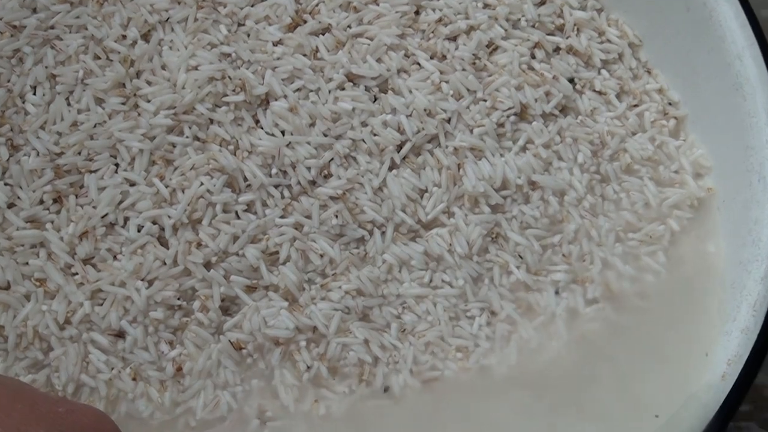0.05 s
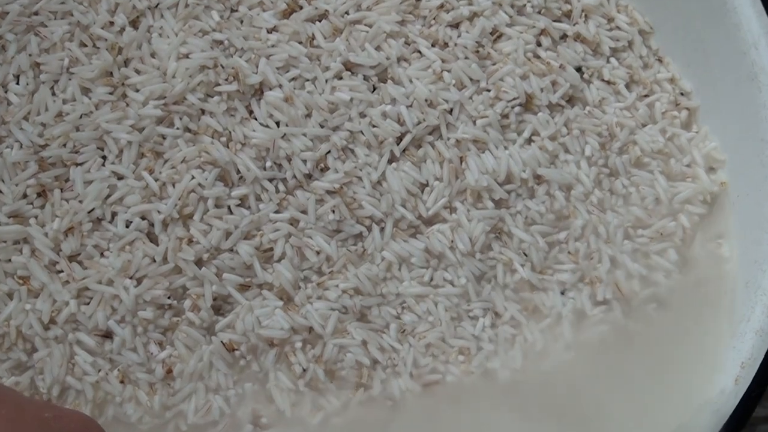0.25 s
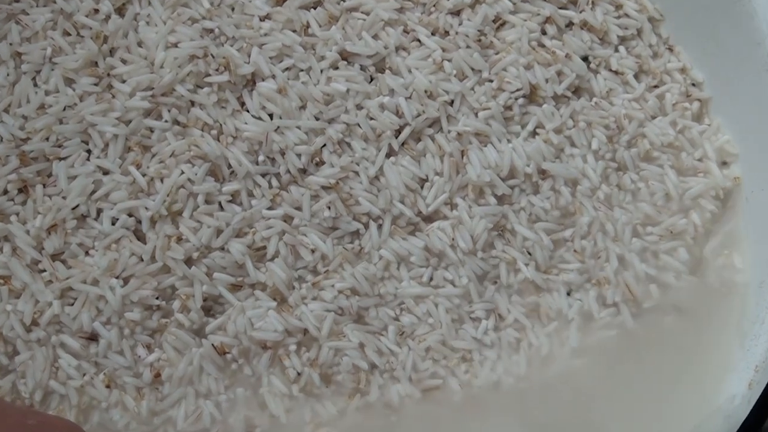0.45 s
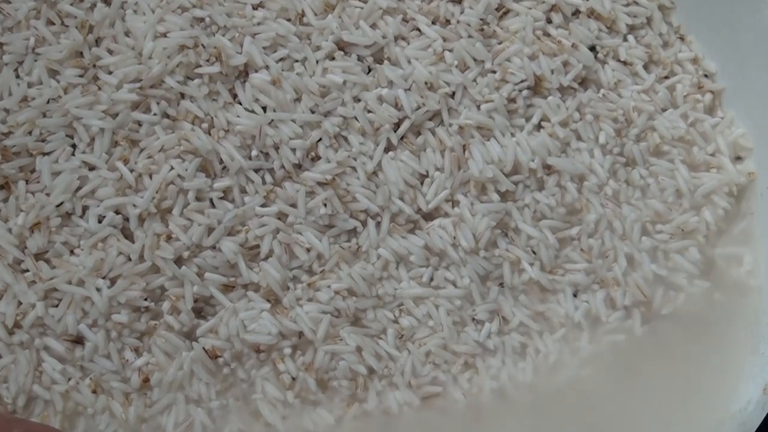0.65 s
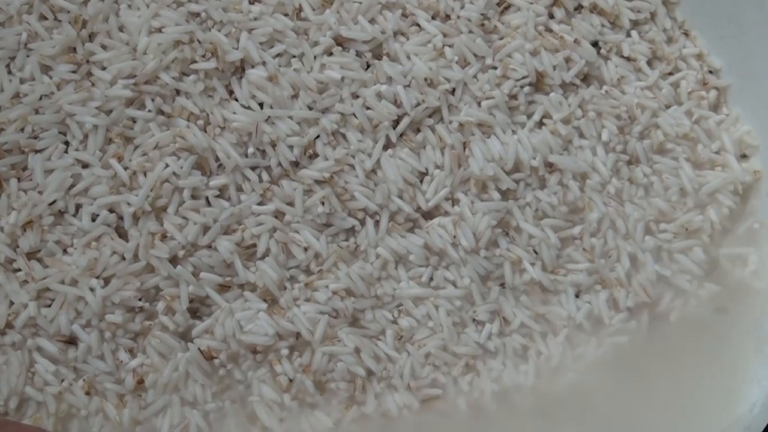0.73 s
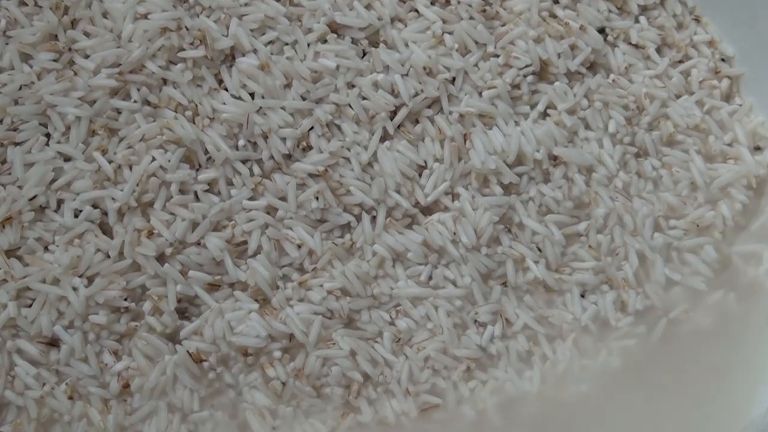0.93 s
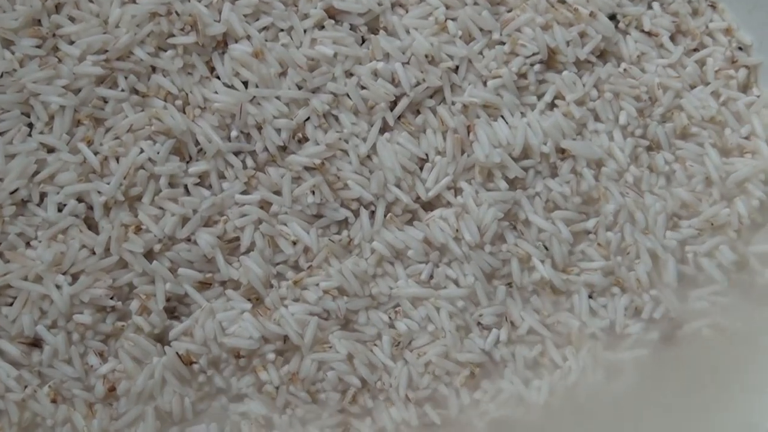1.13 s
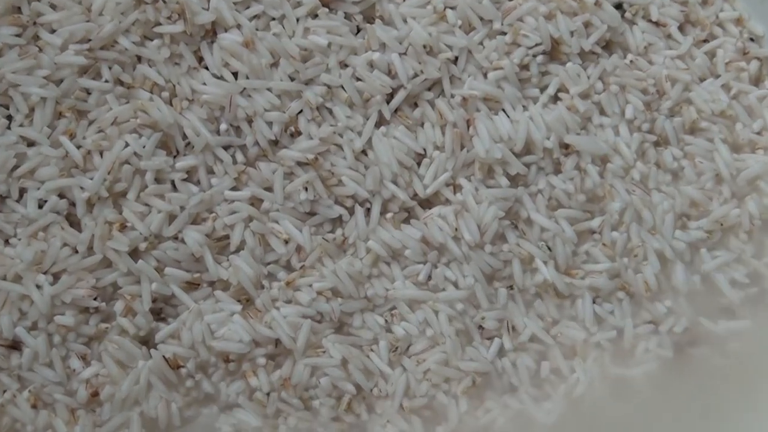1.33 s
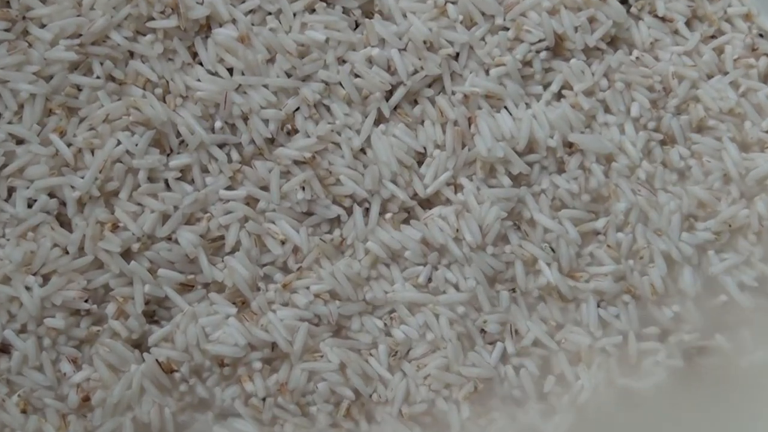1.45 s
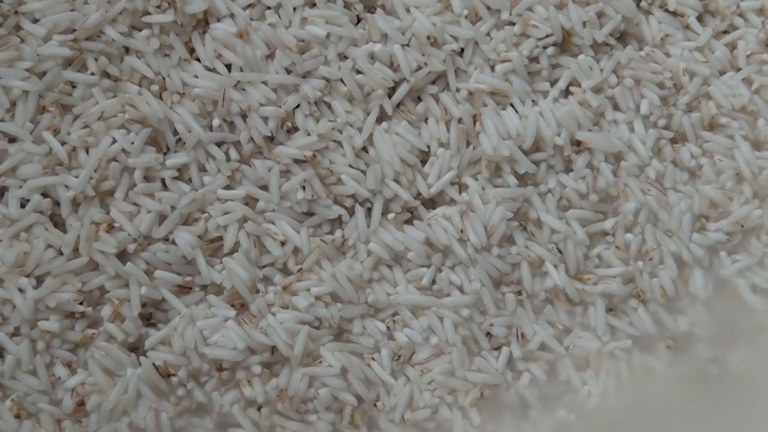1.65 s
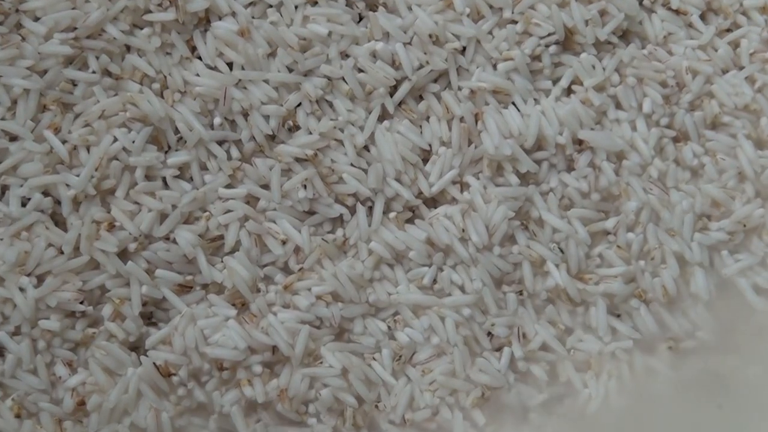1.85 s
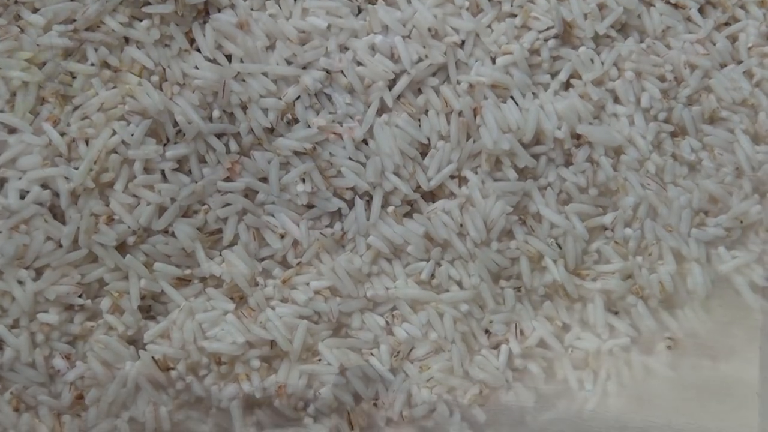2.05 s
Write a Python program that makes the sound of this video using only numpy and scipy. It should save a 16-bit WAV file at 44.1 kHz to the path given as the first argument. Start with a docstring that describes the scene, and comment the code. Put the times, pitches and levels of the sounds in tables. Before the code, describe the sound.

Water draining through wet rice with small irregular pops, ticks and a fine fizz.

```python
"""Water drains through wet rice in a bowl, close to the microphone, in a quiet kitchen.
First come small ticks over a fine fizz and faint bubbles: air pockets open between the grains, and
each snaps and rings briefly. From 0.4 s large pockets join in as plops, around two soft hand bumps.
The fizz is strongest near 1 s, runs of collapsing foam crowd in near 1.5 s, and after a plop at 1.8 s
lighter ticks end the scene. The bowl and the kitchen answer every pop briefly."""
import sys
import numpy as np
from scipy import signal
from scipy.fft import rfft, irfft, next_fast_len
from scipy.io import wavfile

SR = 44100
rng = np.random.default_rng(int(sys.argv[2]) if len(sys.argv) > 2 else 0)


def generate_wav(sig):
    """Save sig (samples, or channels by samples) to the path in sys.argv[1] as 16-bit PCM at SR."""
    pcm = np.round(np.clip(np.atleast_2d(sig).T, -1, 1) * 32767).astype(np.int16)
    wavfile.write(sys.argv[1], SR, pcm)


N = 92610  # 2.1 s

POP_RISE, BUBBLE_RISE = 0.07, 0.077  # share by which the pitch climbs in one fade time
LOW_CUT_RATIO = 0.68  # sound below this share of a pocket's pitch is filtered away


def amp(db):
    """Turn decibels into a gain to multiply by."""
    return 10 ** (np.asarray(db) / 20)


def unit(x):
    """Scale a sound so that its average strength (rms) is 1."""
    return x / np.sqrt(np.mean(x ** 2))


def band(x, hz, kind, order=2):
    """Keep the "low" or the "high" side of a frequency; a higher order cuts more steeply."""
    return signal.sosfilt(signal.butter(order, min(hz, .45 * SR), kind, fs=SR, output="sos"), x)


def add(out, at, x):
    """Mix a short stereo sound in at a time in seconds."""
    i = int(np.clip(at * SR, 0, N - 1))
    out[:, i:i + x.shape[1]] += x[:, :N - i]


def spectrum_curve(points):
    """Join (Hz, value) points into a curve over all frequencies, on a log scale."""
    hz, value = np.array(points).T
    return np.interp(np.log(np.fft.rfftfreq(N, 1 / SR) + 1), np.log(hz), value)


def stereo(x, place):
    """The microphone's right opening hears a sound later than its left, by its place in the bowl."""
    size = next_fast_len(len(x) + 32)
    lag_s = np.array([[0], [43e-6 + 20e-6 * place]])
    delay = np.exp(-2j * np.pi * np.fft.rfftfreq(size, 1 / SR) * lag_s)
    return irfft(rfft(x, size) * delay, size)


def ring(hz, cycles, rise):
    """An air pocket swells and rings; `cycles` is its fade time, the swings it takes to fall to 37%."""
    turns = np.arange(int(7 * cycles / hz * SR) + 2) / SR * hz
    age = turns / cycles
    swell = 1 - np.exp(-turns / 0.18)
    tone = np.sin(2 * np.pi * turns * (1 + rise * (age / 2 - 1)))
    return swell * np.exp(-age) * tone


def background():
    """Quiet room noise with a faint wavering hum and a deep rumble."""
    # tone colour of the room noise (frequency [Hz], relative level [dB])
    colour = [(12, 4), (20, 0.5), (130, -6), (399, -11), (513, -8), (849, -11.5), (1000, -8), (1400, -13),
              (2080, -15.5), (3530, -13), (4060, -25), (5230, -17), (7310, -18.5), (14700, -24.5),
              (16000, -18)]
    # how alike the noise is left and right (frequency [Hz], likeness [-1 to 1])
    likeness = [(30, 0.22), (120, 1), (330, 0.34), (700, 0.5), (2500, 0.65), (7000, 0.045), (15000, 0.062)]
    # faint tones of the room (pitch [Hz], level [dB])
    hum_tones = [(51, -64.5), (104, -66), (132, -63), (528, -76)]
    common, side = rfft(rng.standard_normal((2, N))) * amp(spectrum_curve(colour))
    alike, left_right = np.clip(spectrum_curve(likeness), -1, 1), np.array([[1], [-1]])
    air = unit(irfft(np.sqrt(1 + alike) * common + left_right * np.sqrt(1 - alike) * side, N))
    t, hum = np.arange(N) / SR, np.zeros(N)
    for hz, db in hum_tones:
        waver = 0.87 * unit(band(rng.standard_normal(N), 9.5, "low"))
        hum += amp(db) * np.sqrt(2) * np.sin(2 * np.pi * hz * t + waver)
    deep = band(rng.standard_normal((3, N)), 21.3, "low")
    rumble = unit(deep[:2] + deep[2])  # the third noise is shared by both sides
    return amp(-47) * air + hum + amp(-45.5) * rumble


def echo_tail(db, fade_s):
    """Two unrelated washes of dense echoes that fall by 60 dB in fade_s seconds."""
    t = np.arange(SR // 3) / SR
    swell = 1 - np.exp(-(t / 0.0013) ** 2)
    wash = rng.standard_normal((2, len(t))) * np.exp(-np.log(1000) * t / fade_s) * swell
    return amp(db) * wash / np.sqrt(np.sum(wash ** 2, axis=1, keepdims=True))


def kitchen(x):
    """A sound arrives directly, with near echoes and the bowl's ring; a duller room tail follows."""
    # echoes from bowl, counter and wall (delay [ms], gain [factor])
    echoes = [(1.7, 0.14), (4.45, 0.19), (6.7, 0.14), (12.9, 0.11), (16.9, 0.13)]
    # the bowl's own notes (pitch [Hz], relative level [dB], time to fall by 60 dB [s])
    bowl_notes = [(530.6, -29, 0.11), (1015, -32, 0.062), (2248, -45, 0.11), (2755, -32.5, 0.029),
                  (3661, -30, 0.037), (5300, -31.5, 0.02)]
    # how much louder the left is than the right (frequency [Hz], level gap [dB])
    left_lead = [(500, -7.5), (2500, -1.5), (3700, -2.5), (5200, 1.3), (9000, -0.5), (14000, -0.7)]
    t, hz = np.arange(SR // 3) / SR, np.fft.rfftfreq(2 * N, 1 / SR)
    bowl = amp(-5.5) * sum(amp(db) * np.exp(-np.log(1000) * t / fade_s) * np.cos(2 * np.pi * pitch * t)
                           for pitch, db, fade_s in bowl_notes)
    bounces = sum(gain * np.exp(-2j * np.pi * hz * ms / 1000) for ms, gain in echoes)
    near = 1 + bounces + rfft(bowl, 2 * N)  # the 1 is the direct sound
    common, side = rfft(echo_tail(db=-7.5, fade_s=.055) + echo_tail(db=-10.5, fade_s=.09), 2 * N)
    alike = 1 / (1 + (hz / 6800) ** 2)  # low notes are alike on both sides
    left_right = np.array([[1], [-1]])
    far = np.sqrt(1 + alike) * common + left_right * np.sqrt(1 - alike) * side
    far /= np.sqrt(2 + 2 * (hz / 10400) ** 2)  # the tail loses treble
    balance = amp(left_right * np.interp(hz, *np.array(left_lead).T) / 2)
    return irfft(rfft(x, 2 * N) * (near + far) * balance)[:, :N]


def hand_bumps():
    """The hand shifts and gives two dull thuds."""
    # soft, low handling bumps (time [s], pitch [Hz], level before filtering [dB])
    bumps = [(0.328, 103, -33.5), (0.613, 43.4, -32.5)]
    out = np.zeros((2, N))
    for at, hz, db in bumps:
        thud = band(ring(hz, cycles=0.79, rise=0), 2 * hz, "low")
        add(out, at, stereo(amp(db) * thud, place=0))
    return out


def seeping(per_s, db, spread_db, low_hz, high_hz, cycles):
    """Many tiny pockets ring at random moments and places, louder while more water seeps."""
    # strength of the seeping (time [s], level change [dB])
    flow = [(0, -8.5), (.2, -9), (.27, 2.5), (.45, -0.5), (.62, -4.5), (.8, -10), (.98, 5), (1.2, -9.5),
            (1.44, -3.5), (1.65, -5), (1.75, -6.5), (1.9, -6.5), (2.1, -9)]
    out = np.zeros((2, N))
    for when, pitch, size, place in rng.random(size=(3000, 4))[:int(per_s * N / SR)]:
        at = when * N / SR
        boost_db = spread_db * min(-np.log(size), np.pi)  # a few pockets stand out
        strength = amp(db + np.interp(at, *np.array(flow).T) + boost_db)
        hz = low_hz + pitch * (high_hz - low_hz)
        add(out, at, stereo(strength * ring(hz, cycles, BUBBLE_RISE), 4 * place - 2))
    return band(out, LOW_CUT_RATIO * low_hz, "high")


def foam():
    """Foam gives way in dense runs of tiny cells, most pitched low in their range; each run fades."""
    # foam collapsing between the grains (start [s], length [s], base level of a cell [dB])
    runs = [(.218, 0.056, -40), (0.287, 0.061, -38), (0.493, 0.029, -37), (0.603, 0.045, -38.5),
            (0.932, 0.037, -36), (1.07, 0.026, -30), (1.299, .028, -37.5), (1.401, 0.044, -36.5),
            (1.479, 0.034, -30.5), (1.53, 0.018, -32.5), (1.552, 0.026, -31), (1.584, 0.035, -37),
            (1.635, 0.04, -31), (1.943, 0.041, -41), (2.031, 0.027, -38.5)]
    cells_per_s, spread_db, low_hz, high_hz = 1300, 4, 4970, 14600
    out = np.zeros((2, N))
    for (start, length, db), cells in zip(runs, rng.random(size=(len(runs), 256, 4))):
        for when, pitch, size, place in cells[:int(cells_per_s * length)]:
            hz = low_hz * (high_hz / low_hz) ** (pitch ** 2)
            strength = amp(db + spread_db * min(-np.log(size), 2)) * (1 - when / 2)
            cell = strength * ring(hz, cycles=1.9, rise=BUBBLE_RISE)
            add(out, start + when * length, stereo(cell, 4 * place - 2))
    return band(out, LOW_CUT_RATIO * low_hz, "high", order=4)


def bubbles_and_knocks():
    """Soft bubble notes, and two dull low knocks that come with pops."""
    # bubble notes, and two knocks near 1 kHz (time [s], pitch [Hz], level [dB], fade time [cycles])
    notes = [(0.041, 1060, -34, 1.1), (0.3162, 2840, -32, 10.3), (.503, 2270, -28.5, 3.6),
             (.793, 940, -31, 1.2), (0.9445, 2570, -33.5, 4.8), (1.570, 2640, -34.5, 7.4)]
    out = np.zeros((2, N))
    for at, hz, db, cycles in notes:
        add(out, at, stereo(amp(db) * ring(hz, cycles, BUBBLE_RISE), place=0))
    return out


def film_snap(noise, pocket_hz):
    """A film of water breaks in a bright burst under a millisecond long; smaller pockets snap higher."""
    fade_s, pivot_hz, top_hz = 0.00037, 4900, 13200
    age = np.arange(len(noise)) / SR / fade_s
    shape = np.exp(-age) * (1 - np.exp(-5 * age))
    low_hz = pivot_hz * (pocket_hz / pivot_hz) ** 0.94
    burst = band(band(noise * shape, low_hz, "high"), top_hz, "low")
    return unit(burst) * np.sqrt(np.mean(shape ** 2))


def pops():
    """Each film snaps, sets its pocket and a smaller neighbour ringing, and nudges water and bowl."""
    # air pockets opening between the grains
    # (time [s], pitch [Hz], base ring level [dB], base snap level [dB], fade time [cycles])
    pockets = [ (0.017, 6800, -22.5, -25.5, 2.3), (0.042, 5850, -23, -22.5, 5.5),
               (0.14, 5140, -28, -27, 2.9), (0.2176, 6660, -16.5, -16.5, 4.4),
               (0.2604, 5200, -21.5, -20.5, 2.6), (0.2884, 10900, -21, -25.5, 2.1),
               (0.367, 9200, -19, -26, 1.1), (0.3942, 2530, -2.5, -14.5, 2.2),
               (0.4714, 3320, -10, -17, 1.84), (0.4948, 11700, -10, -17.5, 3),
               (0.5419, 3940, -25.5, -18.5, 3.2), (0.5878, 2970, -37, -19, 1.6),
               (0.609, 11800, -2, -19, 0.94), (0.6247, 4780, -10, -17.5, 1.05),
               (0.6677, 9400, -8, -19, 1.4), (0.7145, 5570, -7.5, -17, 1.6),
               (.7279, 2516, -1.5, -14.5, 1.8), (0.7928, 4880, -12, -19.5, 2.1), (0.864, 7960, -22, -27, 1),
               (0.9588, 2650, -8, -24, 1.05), (0.9626, 5770, -11, -37, 3), (.9970, 6100, -22, -22.5, 2.2),
               (1.0355, 2870, -15, -19, 1.26), (1.0477, 5100, -17.5, -22.5, 3.5),
               (1.0720, 3610, -1.5, -13.5, 1.15), (1.0736, 5130, -8.5, -26, 5.1),
               (1.1214, 4730, -33, -27, 3), (1.1775, 8000, -5.5, -16.5, 2.2), (1.2436, 5940, -24, -24, 2.9),
               (1.2985, 8000, -10.5, -20, 2), (1.3741, 2900, -28, -19, 1.7), (1.481, 12500, -8, -20.5, 1.6),
               (1.492, 4170, -14.5, -16, 2.4), (1.5464, 4500, -7, -13, 0.89), (1.5807, 11500, -23, -29, 2),
               (1.588, 6300, -13.5, -20, 2.8), (1.606, 2920, -29, -23, 2.7), (1.6361, 3080, -8, -20.5, 1.4),
               (1.7056, 13900, -11, -35.5, 4.4), (1.7309, 5300, -3.5, -15.5, 0.63),
               (1.7837, 9800, -34, -23, 3), (1.8121, 2330, -7, -18, 2.17), (1.814, 2840, -8, -21, 1.1),
               (1.8821, 13800, -17, -25.5, 2.2), (1.9699, 4800, -26.5, -23.5, 2.4),
               (2.0488, 9300, -19, -19.5, 4.3), (2.0760, 3470, -17, -22, 0.87)]
    snap_early_s, neighbour_late_s, crackle_span_s = .00015, .0007, .008
    water_push = band(ring(hz=2320, cycles=0.58, rise=0), 1410, "high")
    bowl_knock = band(ring(hz=905, cycles=0.65, rise=0), 905 / 2, "high")
    out = np.zeros((2, N))
    noises, chances = rng.standard_normal(size=(len(pockets), 4, 256)), rng.random(size=(len(pockets), 4))
    for (at, hz, ring_db, snap_db, cycles), noise, chance in zip(pockets, noises, chances):
        place = 2 * chance[0] - 1
        pocket = band(ring(hz, cycles, POP_RISE), LOW_CUT_RATIO * hz, "high", order=5)
        neighbour_hz = min(1.42 * hz, 13200)
        neighbour = band(ring(neighbour_hz, cycles=2, rise=POP_RISE), hz, "high")
        add(out, at - snap_early_s, stereo(amp(snap_db + 1.5) * film_snap(noise[0], hz), place))
        add(out, at, stereo(amp(ring_db) * pocket, place))
        add(out, at, stereo(amp(snap_db - 11) * water_push, place))
        add(out, at, stereo(amp(snap_db - 17) * bowl_knock, place))
        add(out, at + neighbour_late_s, stereo(amp(ring_db - 7.5) * neighbour, place))
        for burst, wait in zip(noise[1:], chance[1:]):  # three smaller films break just after
            crackle = amp(snap_db - 3.5) * film_snap(burst, hz)
            add(out, at + crackle_span_s * wait ** 2, stereo(crackle, -place))
    return out


def scene():
    """Pops, bubbles, knocks, foam and seeping water in the kitchen, over hand bumps and room noise."""
    fizz = seeping(per_s=600, db=-37, spread_db=4.2, low_hz=4200, high_hz=14900, cycles=1.57)
    gurgle = seeping(per_s=350, db=-45.5, spread_db=2.5, low_hz=2320, high_hz=7200, cycles=4.6)
    return kitchen(pops() + bubbles_and_knocks() + foam() + fizz + gurgle) + hand_bumps() + background()


def record(dry):
    """The recorder rounds off the sharpest peaks and cuts the highest treble."""
    ceiling, top_hz = .55, 15900
    rounded = ceiling * np.tanh(dry / ceiling)
    return signal.sosfilt(signal.ellip(8, .2, 70, top_hz, fs=SR, output="sos"), rounded)


dry = scene()
out = record(dry)
generate_wav(out)
```